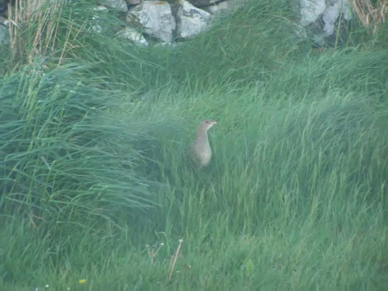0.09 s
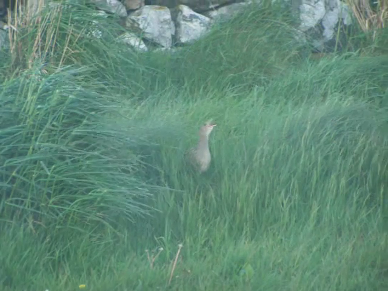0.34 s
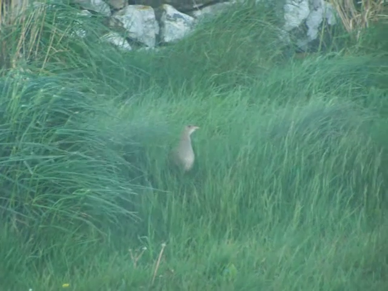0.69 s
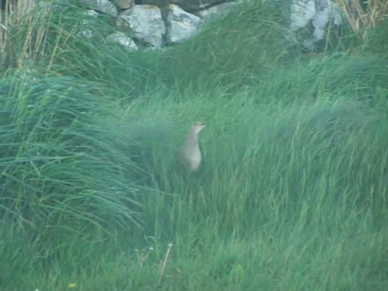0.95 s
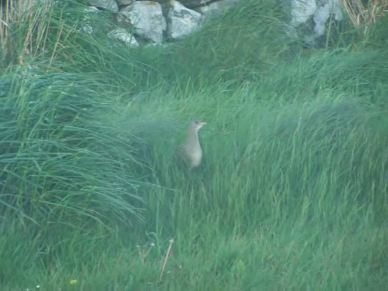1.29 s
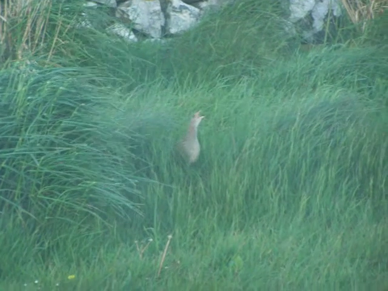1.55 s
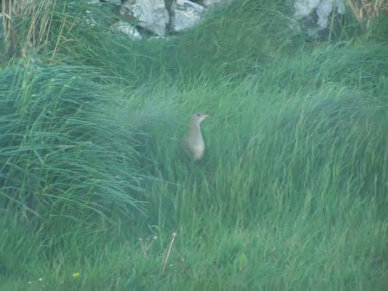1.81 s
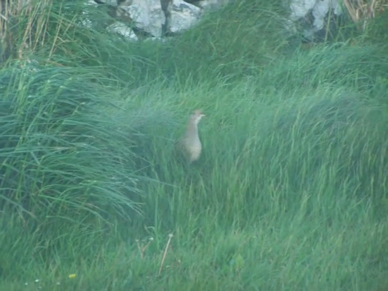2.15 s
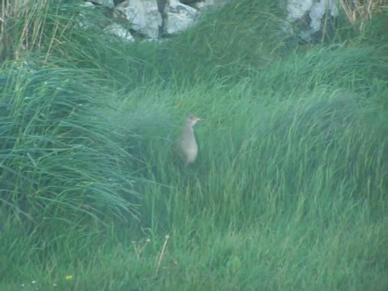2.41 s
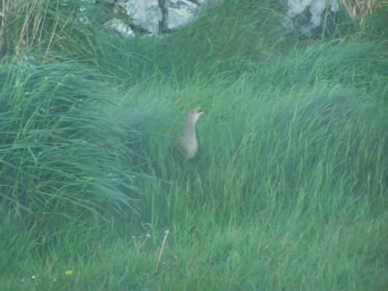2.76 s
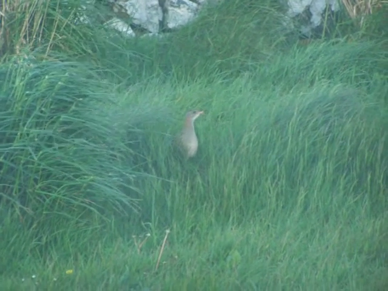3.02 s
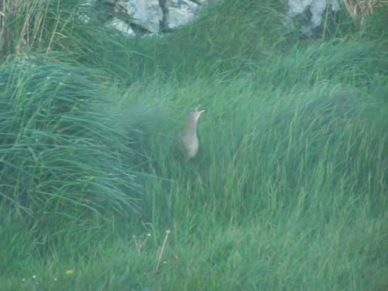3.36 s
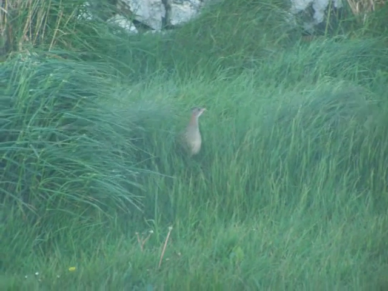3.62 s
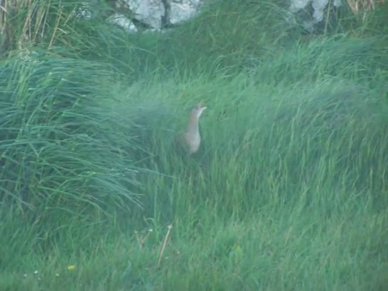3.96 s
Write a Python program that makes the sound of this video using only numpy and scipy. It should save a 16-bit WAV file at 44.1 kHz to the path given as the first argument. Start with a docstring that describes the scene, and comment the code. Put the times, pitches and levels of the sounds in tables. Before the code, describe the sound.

A corncrake rasps harshly outdoors in long grass. The sound fades in on one faint call, then three pairs of short, grating calls follow over steady hiss and low hum, with a few faint knocks near the microphone.

```python
"""A corncrake rasps in pairs, crex-crex, from long grass before a stone wall.
Each rasp is a train of sharp pulses, in limping groups of three, that excite the resonances of throat
and beak and then scatter off wall and grass. Faint knocks and ticks sound close by, over outdoor hiss
and a low hum. The sound fades in."""
import sys
import numpy as np
from scipy import signal
from scipy.fft import rfft, irfft
from scipy.io import wavfile

SR = 44100
rng = np.random.default_rng(int(sys.argv[2]) if len(sys.argv) > 2 else 0)


def waveform_to_disk(signal):
    """Save audio, clipped to [-1, 1], as 16-bit WAV at the path in sys.argv[1]."""
    frames = np.transpose(np.atleast_2d(signal))
    scaled = np.clip(frames, -1, 1) * 32767
    samples = np.round(scaled).astype(np.int16)
    wavfile.write(sys.argv[1], SR, samples)


N = 176400
T = np.arange(N) / SR

# outdoor noise spectrum: (frequency [Hz], relative density [dB])
AIR_SPECTRUM = [(15, -38), (25, -14), (37, -17.5), (54, -7), (75, -10), (228, -10), (264, -12.5),
                (500, -15.5), (993, -21), (1580, -21), (2930, -23.5), (3930, -23.5), (6580, -26.5),
                (8000, -32.5), (8830, -55.5), (11500, -84), (19400, -120)]
# partials of the hum: (frequency [Hz], level [dB])
HUM_PARTIALS = [(49.4, -52.5), (98.9, -67)]
# soft rattling knocks: (time [s], level [dB], length [s])
KNOCK_EVENTS = [(1.453, -59, 0.038), (1.527, -48.5, 0.056), (2.682, -49.5, 0.059), (3.464, -61, 0.049),
                (3.844, -47.5, 0.061), (3.913, -50, 0.041)]
# modes of the knocked body: (frequency [Hz], bandwidth [Hz], gain [dB])
KNOCK_MODES = [(560, 170, 0), (1090, 48, 4.5), (1645, 87, 3), (1984, 81, -5), (2900, 120, -7),
               (3770, 230, -3)]
# squeaky ticks: (time [s], level [dB], length [s], frequency [Hz], bandwidth [Hz])
TICK_EVENTS = [(1.453, -47.5, 0.029, 3630, 450), (3.732, -53.5, 0.044, 3780, 593),
               (3.737, -52.5, 0.011, 1950, 90), (3.766, -59.5, .02, 2020, 90)]
# rasps: (time [s], length [s], relative level [dB], slowness [ratio], treble tilt [dB/octave])
RASP_EVENTS = [(0.403, 0.21, -42, 0.87, 0.5), (1.090, 0.17, -39.5, 1.06, 0.6),
               (1.574, 0.18, -39.5, .998, 1), (2.262, 0.17, -40.5, 1.012, 0),
               (2.743, 0.16, -39.5, .99, 0.5), (3.436, 0.17, -43, 1.02, -1.2),
               (3.9384, .165, -42, 1.09, -1)]
# the three pulses of a group at slowness 1: (onset [s], period [s], relative level [dB])
PULSE_GROUP = [(.0008, .0267, 0), (.0071, .0268, -1), (.0158, .0273, 0)]
# resonances of throat and beak: (frequency [Hz], bandwidth [Hz], gain [dB])
THROAT_MODES = [(1160, 580, -21.5), (2075, 82, -11.5), (2519, 160, -6.5), (2986, 65, 1), (3282, 102, 0),
                (3703, 285, -3.5), (4525, 365, -6.5), (5068, 260, -8.5), (5020, 114, -4), (5884, 390, -4.5),
                (6034, 466, -10.5), (6400, 140, -15.5), (7220, 140, -14), (7750, 170, -24)]
# dips where near reflections cancel the direct sound: (frequency [Hz], bandwidth [Hz], gain [dB])
REFLECTION_DIPS = [(2598, 210, -20.5), (4580, 300, -19), (7430, 220, -8.5)]
# fade-in, held at its last gain: (time [s], gain [dB])
FADE_IN = [(.333, -70), (.338, -28), (.42, -25), (.5, -21), (.6, -16), (.7, -10.5), (.77, -5.5)]


def from_db(db):
    """The decibel scale: a level as an amplitude ratio."""
    return 10 ** (np.asarray(db) / 20)


def rms_one(x):
    """Normalisation to unit mean power."""
    return x / np.sqrt(np.mean(x ** 2) + 1e-20)


def unit_energy(x):
    """Normalisation of each row to unit energy."""
    return x / np.sqrt(np.sum(x ** 2, axis=-1, keepdims=True) + 1e-20)


def add(out, s, x):
    """Superposition: x adds to out from time s on."""
    i = int(s * SR)
    out[i:i + len(x)] += x[:max(len(out) - i, 0)]


def butter(x, hz, kind):
    """Second-order filtering: 12 dB per octave beyond the cutoff."""
    return signal.sosfilt(signal.butter(2, min(hz, .45 * SR), kind, fs=SR, output="sos"), x)


def resonate(x, modes):
    """Modal response: damped resonators in parallel, summed with alternating signs."""
    out = 0
    for k, (hz, width, db) in enumerate(modes):
        r = np.exp(-np.pi * width / SR)
        poles = [1, -2 * r * np.cos(2 * np.pi * hz / SR), r * r]
        ringing = signal.lfilter([1, 0, -1], poles, x + 1e-18)
        out = out + (-1) ** k * from_db(db) * (1 - r * r) / 2 * ringing
    return out


def background():
    """Spectral shaping of noise gives hiss and rumble; amplitude modulation makes a low hum waver."""
    hz, db = np.transpose(AIR_SPECTRUM)
    bin_hz = np.maximum(np.fft.rfftfreq(N, 1 / SR), 1)
    spectrum = from_db(np.interp(np.log(bin_hz), np.log(hz), db))
    air = rms_one(irfft(rfft(rng.normal(size=N)) * spectrum, N))
    waver_db = .6 * np.interp(T, np.linspace(0, T[-1], 40), rng.normal(size=40))
    hum = sum(from_db(level) * np.sqrt(2) * np.sin(2 * np.pi * (f * T + rng.random()))
              for f, level in HUM_PARTIALS)
    return from_db(-51.5) * air + from_db(waver_db) * hum


def scuff(length, modes):
    """Impact excitation: a dying run of tiny random contacts sets a body's modes ringing."""
    t = T[:SR // 6]
    contacts = rng.normal(size=len(t)) * (rng.random(len(t)) < 3000 / SR)   # 3000 per second
    envelope = np.exp(-(t / length) ** 2)
    return unit_energy(resonate(contacts * envelope, modes)) * np.sqrt(length * SR)


def knocks_and_ticks():
    """Damped vibration close by: a knock rings in several modes, a tick in one."""
    out = np.zeros(N)
    for start, db, length in KNOCK_EVENTS:
        add(out, start, from_db(db) * scuff(length, KNOCK_MODES))
    for start, db, length, hz, width in TICK_EVENTS:
        add(out, start, from_db(db) * scuff(length, [(hz, width, 0)]))
    return butter(out, 5000, "low")


def grass_and_wall(x):
    """Diffuse reflection adds quick scatter and a faint tail, both decaying exponentially."""
    t = T[:SR // 2]
    build_up = 1 - np.exp(-t / 0.0064)
    def reflections(t60_s):
        return unit_energy(rng.normal(size=len(t)) * from_db(-60 * t / t60_s) * build_up)
    response = from_db(-2.5) * reflections(t60_s=.12) + from_db(-14.5) * reflections(t60_s=.55)
    return x + butter(signal.fftconvolve(x, response)[:N], 7550, "low")


def reflection_dips(x):
    """Destructive interference: notches stand for near reflections cancelling the direct sound."""
    for hz, width, db in REFLECTION_DIPS:
        x = x - (1 - from_db(db)) * resonate(x, [(hz, width, 0)])
    return x


def puffs(count, rise_s=.001, snap_db=-9):
    """Turbulent excitation: each row is a brief burst of noise with an impulsive snap at its crest."""
    age = T[:SR // 30] / rise_s
    bursts = unit_energy(rng.normal(size=(count, len(age))) * age * np.exp(-age))
    bursts[:, int(rise_s * SR)] += from_db(snap_db)
    return bursts


def throat(x, tilt_db):
    """Resonances of throat and beak filter the source; the bass is cut."""
    lowest_hz = THROAT_MODES[0][0]
    modes = [(hz, width, db + tilt_db * np.log2(hz / lowest_hz)) for hz, width, db in THROAT_MODES]
    return butter(resonate(x, modes), 660, "high")


def rasp(length, slowness, tilt_db, jitter_s=.00025, spread_db=1.0):
    """Source and filter: three interleaved pulse trains ring the throat; effort swells, holds, sags."""
    out = np.zeros(SR // 4)
    for onset, period, db in PULSE_GROUP:
        pulses = unit_energy(reflection_dips(throat(puffs(count=8), tilt_db)))
        for k, pulse in enumerate(pulses):
            start = max((onset + k * period) * slowness + jitter_s * rng.normal(), 0)
            swell_db = -3.5 * np.exp(-start / 0.024)
            sag_db = -5.5 * np.exp(min(start - length, 0) / 0.015)
            gain = from_db(db + swell_db + sag_db + spread_db * rng.normal())
            if start < length:
                add(out, start, gain * pulse)
    return unit_energy(out) * np.sqrt(length * SR)


def corncrake(gain_db=0.88):
    """The rasps reach the listener by the direct path and by reflection from grass and wall."""
    out = np.zeros(N)
    for start, length, db, slowness, tilt_db in RASP_EVENTS:
        add(out, start, from_db(db + gain_db) * rasp(length, slowness, tilt_db))
    return grass_and_wall(out)


def scene():
    """Superposition: the pressures of all sources add in one channel."""
    return (corncrake() + knocks_and_ticks() + background())[None]


def record(dry, cutoff_hz=8800):
    """A rising gain fades the sound in; an elliptic low-pass filter cuts the treble steeply."""
    faded = dry * from_db(np.interp(T, *np.transpose(FADE_IN)))
    return signal.sosfilt(signal.ellip(10, .2, 80, cutoff_hz, fs=SR, output="sos"), faded)


dry = scene()
out = record(dry)
waveform_to_disk(out)
```